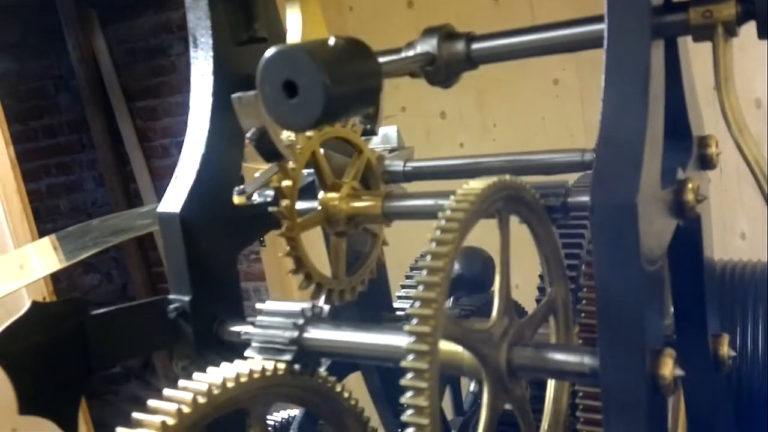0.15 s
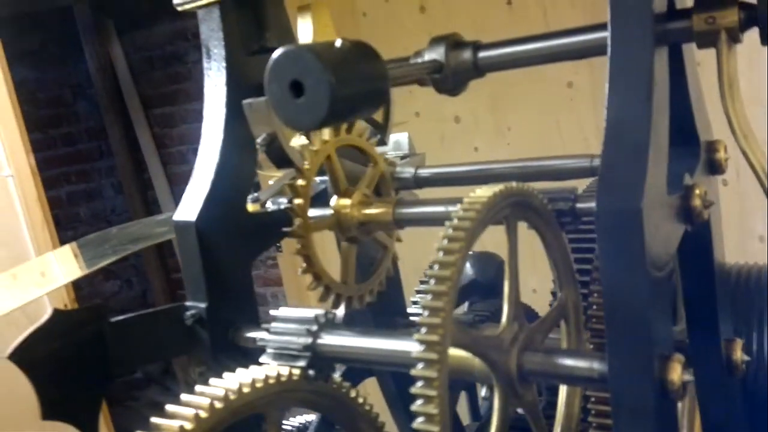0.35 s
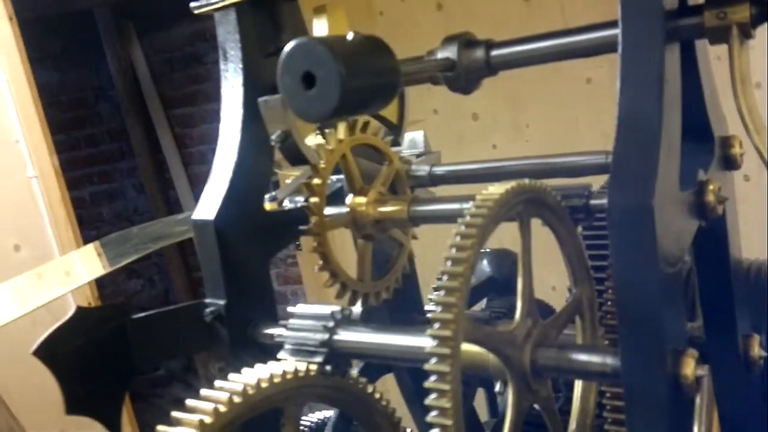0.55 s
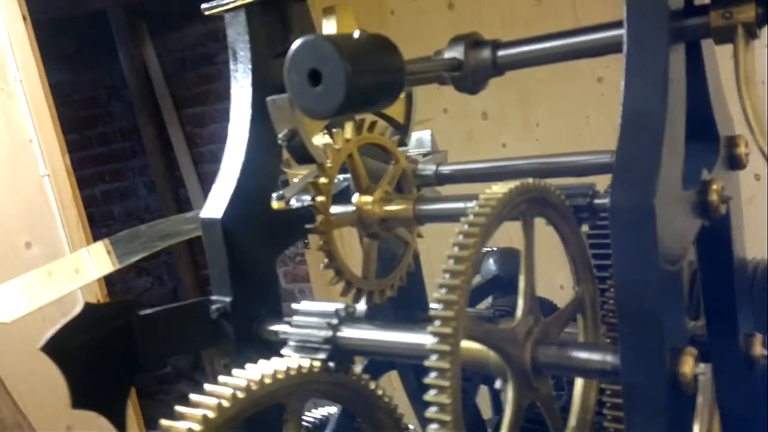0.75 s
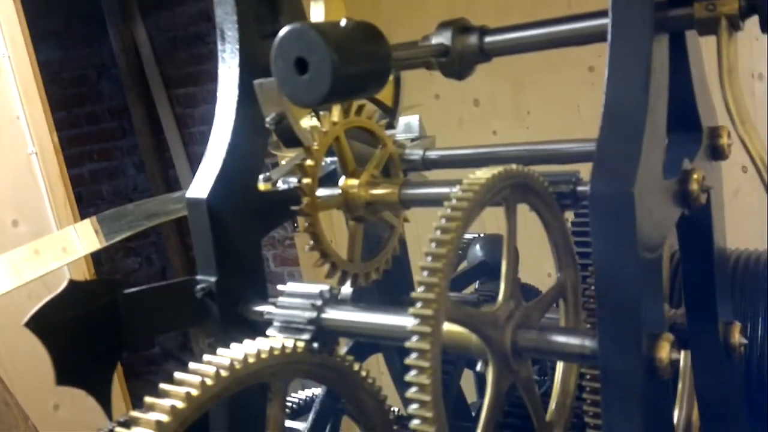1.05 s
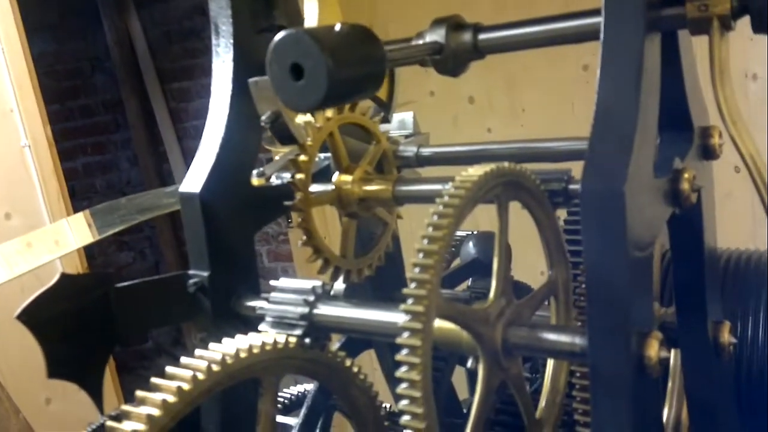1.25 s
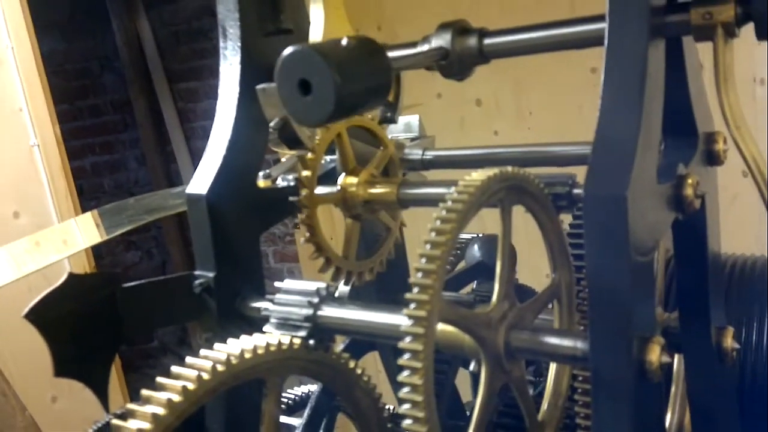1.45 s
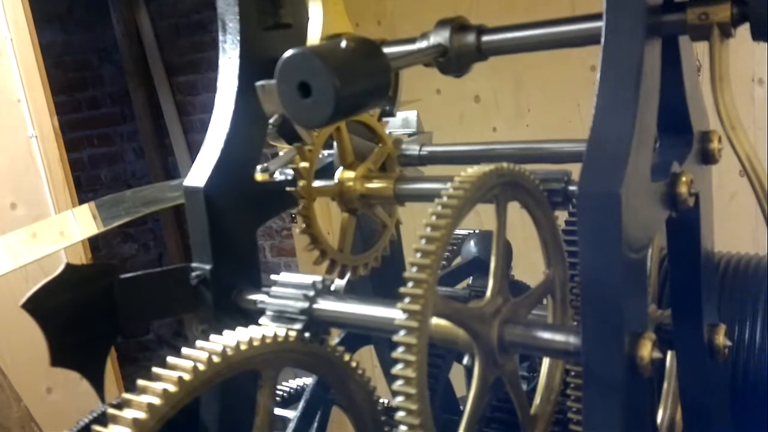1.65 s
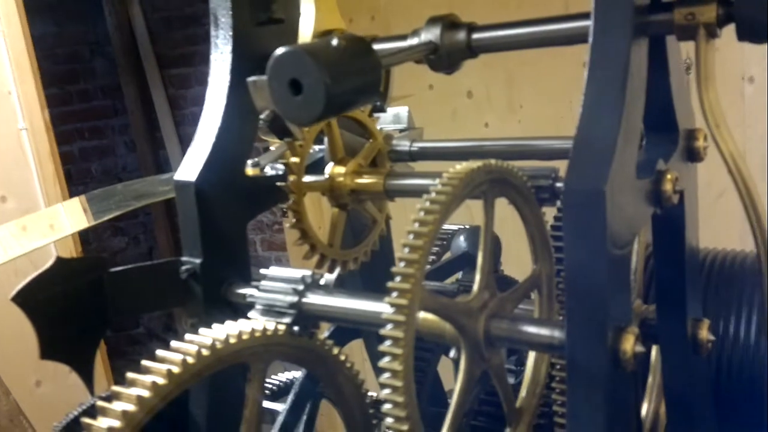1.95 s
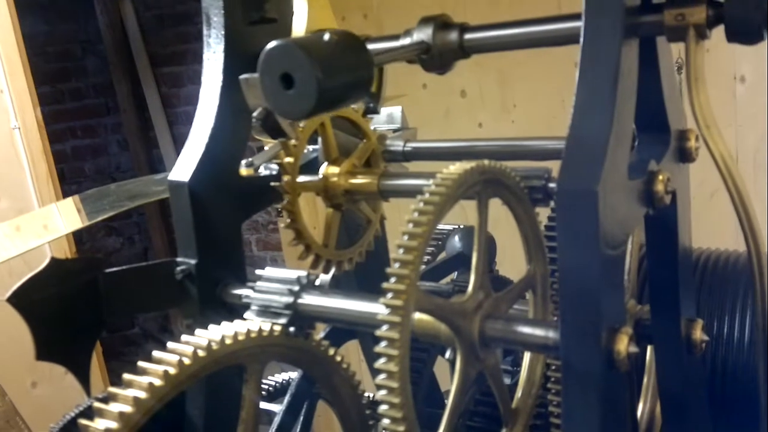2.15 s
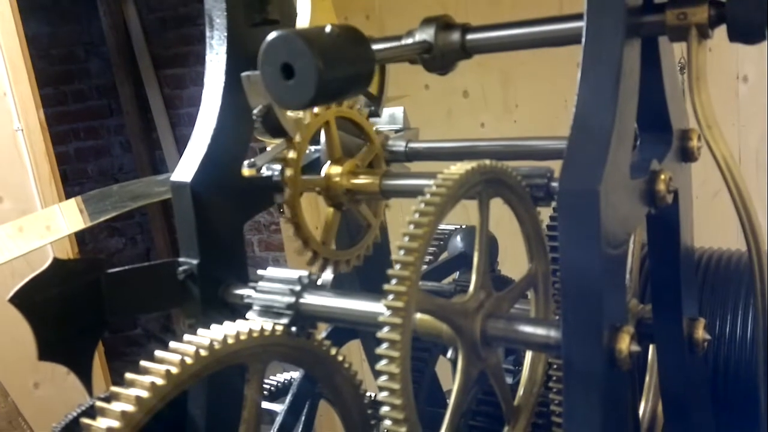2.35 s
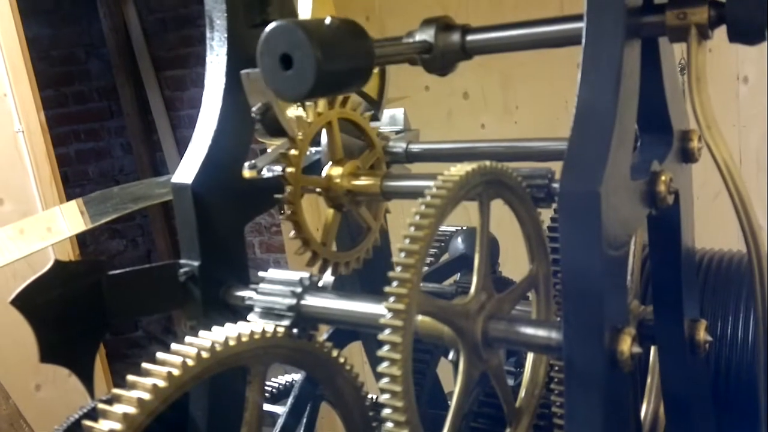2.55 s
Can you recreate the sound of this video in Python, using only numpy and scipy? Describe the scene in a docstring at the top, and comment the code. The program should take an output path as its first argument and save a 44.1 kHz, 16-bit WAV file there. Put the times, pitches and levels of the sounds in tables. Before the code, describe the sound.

A tower clock escapement beats close by in a quiet timber room. At about 0.24 s a bright tick runs into a heavy iron clack and rebound, ringing briefly over a low wooden thump. A softer, shorter, darker tick-clack comes at 1.5 s, and another strong one at 2.38 s. Faint rustles pass near 0.6, 2.0 and 2.64 s over soft hush and low rumble.

```python
"""A tower clock escapement beats three times in a quiet timber room, close to a small stereo microphone.
Each beat is a light bright tick as the tooth slips off, then a heavy blow and a rebound on the pallet:
shaped noise for the dense ring, decaying sines for the iron frame, slow low swings for its wooden stand.
Soft rustles are brief swells of noise; room hush and low rumble are noise with a drifting spectrum.
A noise suppressor turns down each band while it is near its quiet level."""
import sys
import numpy as np
from scipy import signal
from scipy.fft import rfft, irfft
from scipy.io import wavfile
from scipy.ndimage import uniform_filter1d

SR = 44100
rng = np.random.default_rng(int(sys.argv[2]) if len(sys.argv) > 2 else 0)


def dump(signal):
    """Clip the signal to [-1, 1] and save it as 16-bit WAV at the path in sys.argv[1]."""
    limited = np.clip(np.atleast_2d(signal).T, -1, 1)
    pcm = np.round(limited * 32767).astype(np.int16)
    wavfile.write(sys.argv[1], SR, pcm)


def voltage_ratio(level):
    """Linear amplitude factor for a level in decibels (scalar or array-like)."""
    return 10 ** (np.asarray(level, float) / 20)


N = 121275
CONTACT_SAMPLES = 16384  # length of one contact's ring

# iron frame modes: pitch_hz, entry_db and exit_db (relative, by pallet struck), t60_s (before steepening)
FRAME_MODES = [(236, -10, -11, 0.29), (291.2, -9, -10, 0.26), (331.3, -1.5, -22, .22), (382.7, 0, -2, 0.27),
               (473, -11.5, -4, 0.21), (616.5, -4, -9, 0.2), (706, -5.5, -14, 0.14), (740.3, -3.5, 0, 0.19),
               (857.7, 3.5, -10, 0.21), (1067, 3, 3, .11), (1140, -13, -19, .15), (1264, -19, -26, 0.1),
               (1508, -42, -27, .17), (1627, -15, -8, 0.25), (3265, -8, -12.5, .22), (3313, -12, -26, 0.33),
               (4046, -10.5, -6, 0.28), (4350, -11.5, -21, 0.32), (5370, -17, -27, 0.29)]
# how the ring builds and dies: band_hz, rise_s, t60_s (before steepening), steepening (dB per s squared)
RING_DECAY = [(121.2, .03, .25, 899), (260, 0.0083, 0.39, 496), (500, .006, .42, 77),
              (1000, .002, 0.43, 59.5), (1700, 0.0044, 0.31, 81), (2259, .0015, .38, 302.5),
              (3000, .001, .34, 1250), (4500, .001, .33, 1400), (7950, 0.00077, 0.33, 901),
              (14000, .0005, .22, 699.5)]
# stereo balance of the pallet blows: band_hz, left_minus_right_db
BEAT_BALANCE = [(80, -7), (300, -6.5), (520, -5), (720, -9), (1200, -4.5), (2600, -10), (3500, -16),
                (4600, -7), (6000, -3.5), (13000, -1)]
# stereo likeness of every contact: band_hz, likeness (-1 to 1)
BEAT_LIKENESS = [(70, -0.31), (130, 1), (720, 1), (950, 1), (1250, .68), (1600, -0.0057), (2100, 0.4),
                 (2700, -0.8), (4000, 0.32), (13000, -.1)]


def evened(x):
    """Scales to rms 1."""
    return x / np.sqrt(np.mean(x ** 2) + 1e-20)


def read(points, hz, axis=1):
    """Reads one column of a table, joined on a log-frequency axis."""
    rows = np.array(points, float)
    return np.interp(np.log(hz + 1), np.log(rows[:, 0] + 1), rows[:, axis])


def add(mix, s, sound):
    """Mixes a two-channel sound in at s seconds."""
    part = mix[:, round(s * SR):][:, :sound.shape[1]]
    part += sound[:, :part.shape[1]]


def ports(a, b, hz, balance, same):
    """Turns two independent signals into left and right with a given balance and likeness."""
    likeness = np.clip(read(same, hz), -1, 1)
    half = voltage_ratio(read(balance, hz) / 2)
    left = a * half
    right = (likeness * a + np.sqrt(1 - likeness ** 2) * b) / half
    return np.array([left, right])


def air(db_field, balance):
    """Stereo noise from short-time spectra shaped by a dB field over frequency and time."""
    # stereo likeness of airborne noise: band_hz, likeness (-1 to 1)
    likeness = [(70, .8), (300, .78), (950, 0.47), (1250, .45), (1600, 0.00098), (2100, -.12), (4000, -.04)]
    hop = 256
    frames = N // hop + 5
    hz = np.fft.rfftfreq(1024, 1 / SR)[:, None]
    a, b, c, d, drift = rng.standard_normal((frames, 513, 5)).T
    spectra = ports(a + 1j * b, c + 1j * d, hz, balance, likeness)
    spectra = spectra * voltage_ratio(db_field(hz, np.arange(frames) * hop / SR, drift))
    return signal.istft(spectra, nperseg=1024, noverlap=768)[1][:, :N]


def hush():
    """Room hush: steady shaped noise with slow swells, drifting patches and a lumpy rumble."""
    # hush spectrum: band_hz, density_db (relative, per Hz)
    spectrum = [(12, -33), (22, -8), (127, -7), (200, -16.5), (300, -14), (450, -21), (950, -15.5),
                (1250, -21.5), (1600, -25.5), (2500, -26), (4000, -26), (8000, -33.5), (14700, -38),
                (16000, -40)]
    # slow swell: time_s, swell_db (scaled by the share of each band)
    swell_curve = [(0, 2.5), (.6, 2.5), (1.3, 2.5), (1.75, 4.5), (1.9, 1), (2.15, 3.5), (2.27, 4), (2.4, 5),
                   (2.55, 6.5), (2.68, 8.5), (2.75, 3.5)]
    # how far each band follows the swell: band_hz, share (0 to 1)
    swell_share = [(60, 0.9), (300, 1), (1200, 1), (3000, .2), (8000, .05)]
    # stereo balance: band_hz, left_minus_right_db
    balance = [(70, 4.5), (150, -1), (600, 0), (1600, -4), (2700, -2), (13000, 0)]
    level_db, patch_db, lump_db, rumble_hz = -55.5, 0.5, 3, 150

    def field(hz, t, drift):
        patches = uniform_filter1d(drift, size=10, axis=0)
        patches = evened(uniform_filter1d(patches, size=12, axis=1))
        lumps = evened(uniform_filter1d(drift[0], size=8))
        lumps_db = lump_db * lumps / (1 + (hz / rumble_hz) ** 2)  # strongest in the rumble
        swell_db = np.interp(t, *np.transpose(swell_curve)) * read(swell_share, hz)
        return read(spectrum, hz) + swell_db + patch_db * patches + lumps_db

    return voltage_ratio(level_db) * evened(air(field, balance))


def low_knock(hz, knock_db):
    """Extra dB that weights the low knock of a blow and fades out above its corner."""
    return knock_db / (1 + (hz / 350) ** 4)


def chatter():
    """Play in the train rattles after a blow: random taps become a level wobble in dB."""
    taps_per_s, depth_db, tap_decay_s = 300, 2.2, 0.002
    struck = rng.random(CONTACT_SAMPLES) < taps_per_s / SR
    taps = struck * rng.exponential(1, CONTACT_SAMPLES)
    rattle = signal.lfilter([1], [1, -np.exp(-1 / (tap_decay_s * SR))], taps)
    rattle = evened(uniform_filter1d(rattle - rattle.mean(), size=30))
    return depth_db * np.clip(rattle, -2, 2)


def dense_ring(tone, balance, knock_db, steep):
    """Wheels, frame and room ring as noise, each band with its own rise and decay."""
    crack_db, crack_s = 14, 0.0039  # early excess that sharpens the contact
    chatter_hz = 1500  # bands above this chatter most
    t = np.arange(CONTACT_SAMPLES) / SR
    hz = np.fft.rfftfreq(CONTACT_SAMPLES, 1 / SR)
    a, b = rfft(rng.standard_normal((2, CONTACT_SAMPLES)))
    spectra = ports(a, b, hz, balance, BEAT_LIKENESS) * voltage_ratio(read(tone, hz))
    spectra /= np.sqrt(np.mean(irfft(spectra.mean(0)) ** 2))  # mono rms 1 before the knock weight
    spectra *= voltage_ratio(low_knock(hz, knock_db))
    wobble_db = chatter()
    mids = np.geomspace(90, 16000, 16)
    out = np.zeros((2, CONTACT_SAMPLES))
    for k, mid in enumerate(mids):
        # overlapping triangles on a log-frequency axis
        band = np.interp(np.log(hz + 1), np.log(mids), np.arange(len(mids)) == k)
        rise, t60, bend = (read(RING_DECAY, mid, axis=j) for j in range(1, 4))
        fade_db = -60 * t / t60 - steep * bend * t ** 2 + crack_db * np.exp(-t / crack_s)
        fade_db += wobble_db / (1 + (chatter_hz / mid) ** 2)
        out += irfft(spectra * band) * (1 - np.exp(-t / rise)) * voltage_ratio(fade_db)
    return out


def frame_ring(modes_db, balance, knock_db, steep):
    """The iron frame rings in decaying sine modes, spread between the channels."""
    t = np.arange(CONTACT_SAMPLES) / SR
    pitch, t60 = np.array(FRAME_MODES)[:, [0, -1]].T[:, :, None]
    side, shift = rng.random((2, len(pitch), 1))
    a = np.sign(side - 0.3) * np.sin(2 * np.pi * pitch * t)  # random polarity
    b = np.sin(2 * np.pi * (pitch * t + shift))  # random phase
    start_db = modes_db[:, None] + low_knock(pitch, knock_db)
    fade_db = start_db - 60 * t / t60 - steep * read(RING_DECAY, pitch, axis=3) * t ** 2
    rising = 1 - np.exp(-t / read(RING_DECAY, pitch))
    modes = ports(a, b, pitch, balance, BEAT_LIKENESS) * voltage_ratio(fade_db) * rising
    return modes.sum(1)


def contact(tone, modes_db, balance, knock_db=0, steep=1):
    """One metal contact excites the dense ring and the frame modes together."""
    return dense_ring(tone, balance, knock_db, steep) + frame_ring(modes_db, balance, knock_db, steep)


def slips():
    """Light bright ticks as a tooth slips off its pallet."""
    # ticks: start_s, level_db
    ticks = [(0.2364, -33), (1.4919, -40), (2.3792, -32.5)]
    # tick spectrum: band_hz, density_db (relative, per Hz)
    tone = [(59, -62.5), (100, -31), (255, -12), (400, -5), (1100, -4), (2000, -14), (2800, -18),
            (3320, -12.5), (4200, -26.5), (5420, -19), (8110, -33.5), (10700, -26.5), (13000, -35),
            (16000, -50.5)]
    # stereo balance: band_hz, left_minus_right_db
    balance = [(200, -5.5), (550, -1.5), (900, -2.5), (1600, -5), (2600, 1.5), (6000, 6), (13000, 6)]
    out = np.zeros((2, N))
    modes_db = np.array(FRAME_MODES)[:, 1] - 3
    for s, db in ticks:
        add(out, s, voltage_ratio(db) * contact(tone, modes_db, balance))
    return out


def entry_blows():
    """Heavy blows and rebounds on the entry pallet, each with its own weight of low knock."""
    # blows and rebounds: start_s, level_db, knock_db (extra weight of the low knock)
    blows = [(0.2517, -23, -3), (0.2580, -26, 1.5), (2.3920, -26, -1), (2.4013, -24, 1)]
    # blow spectrum: band_hz, density_db (relative, per Hz)
    tone = [(59, -33), (100, -10), (300, -5.5), (550, -11), (850, -12), (1100, -12.5), (1650, -13.5),
            (2500, -29.5), (3300, -24.5), (4200, -28), (5400, -31.5), (7000, -37), (8280, -46),
            (10900, -40.5), (16000, -67.5)]
    out = np.zeros((2, N))
    modes_db = np.array(FRAME_MODES)[:, 1] - 2.5
    for s, db, knock_db in blows:
        add(out, s, voltage_ratio(db) * contact(tone, modes_db, BEAT_BALANCE, knock_db))
    return out


def stand():
    """The wooden stand rocks: a low sine swells, then settles."""
    # rocking thumps: start_s, level_db, pitch_hz
    thumps = [(0.255, -52.5, 35), (2.01, -57.5, 40.2), (2.40, -47, 35)]
    rise_s = 0.032
    out = np.zeros((2, N))
    t = np.arange(SR // 4) / SR
    swell = (t / rise_s) ** 2 * np.exp(2 - 2 * t / rise_s)  # peaks at 1 after rise_s
    for s, db, hz in thumps:
        swing = swell * np.sin(2 * np.pi * hz * t)
        add(out, s, voltage_ratio(db) * swing * np.ones((2, 1)))
    return out


def rustles():
    """Brief soft swells of wide noise, with the part below a corner weighted apart."""
    # swells: middle_s, width_s (standard deviation), level_db, low_db (weight below the corner)
    swells = [(0.63, .025, -66.5, 10), (1.998, 0.0215, -55.5, 5.5), (2.638, .013, -57, -19.5)]
    # rustle spectrum: band_hz, density_db (relative)
    tone = [(200, -9.5), (900, 1), (1500, -12), (3000, -7.5), (6000, -11), (11000, -22.5), (15000, -31)]
    # stereo balance: band_hz, left_minus_right_db
    balance = [(100, -1), (500, -8.5), (3000, -7), (5000, -2), (13000, -3.5)]
    corner_hz = 2000
    t, out = np.arange(N) / SR, np.zeros((2, N))
    wide = evened(air(lambda hz, t, drift: read(tone, hz) + 0 * drift, balance))
    low = signal.sosfiltfilt(signal.butter(2, corner_hz, fs=SR, output="sos"), wide)
    for s, width, db, low_db in swells:
        swell = np.exp(-0.5 * ((t - s) / width) ** 2)
        out += voltage_ratio(db) * swell * (wide - low + voltage_ratio(low_db) * low)
    return out


def exit_blows():
    """A blow and a rebound on the exit pallet, whose ring closes sooner."""
    # blow and rebound: start_s, level_db
    blows = [(1.5072, -28), (1.5144, -33)]
    # blow spectrum: band_hz, density_db (relative, per Hz)
    tone = [(59, -55), (130, -23.5), (250, -8.5), (373, -1.5), (750, -6.5), (1170, -13), (1610, -8),
            (2370, -23.5), (3300, -23.5), (4110, -27), (5600, -28), (6300, -48.5), (8000, -46),
            (10900, -54.5), (13000, -76), (16000, -89)]
    out = np.zeros((2, N))
    modes_db = np.array(FRAME_MODES)[:, 2] - 2.5
    for s, db in blows:
        add(out, s, voltage_ratio(db) * contact(tone, modes_db, BEAT_BALANCE, steep=1.9))
    return out


def suppress(x):
    """Noise suppressor: lowers each band while its smoothed power stays near its quiet level."""
    # suppressor bands: band_hz, depth_db, open_db (span above the opening threshold to full opening)
    bands = [(101, 4, 6.5), (517, 4.5, 7), (1450, 5.5, 10.5), (2570, 10, 24), (4000, 14.5, 36.5),
             (12000, 9, 26.5)]
    open_from_db = -0.5  # opening threshold, relative to the quiet level
    hz, t, z = signal.stft(x, SR, nperseg=256, noverlap=192)
    power = uniform_filter1d((abs(z) ** 2).mean(0), size=9, axis=0)
    power = uniform_filter1d(power, size=9, axis=1)
    level_db = 10 * np.log10(abs(power) + 1e-20)
    over_db = level_db - np.median(level_db, axis=1, keepdims=True)  # the median is the quiet level
    shut = np.clip(1 - (over_db - open_from_db) / read(bands, hz, axis=2)[:, None], 0, 1)
    gain = voltage_ratio(-read(bands, hz)[:, None] * shut)
    return signal.istft(z * gain, SR, nperseg=256, noverlap=192)[1][:, :N]


def scene():
    """All sources at the microphone."""
    return hush() + slips() + entry_blows() + stand() + rustles() + exit_blows()


def roll_off(x):
    """The treble ends steeply here."""
    return signal.sosfilt(signal.butter(12, 16430, fs=SR, output="sos"), x)


def record(dry):
    """The microphone signal passes through the noise suppressor."""
    mix = suppress(dry)
    return roll_off(mix)


dry = scene()
out = record(dry)
dump(out)
```